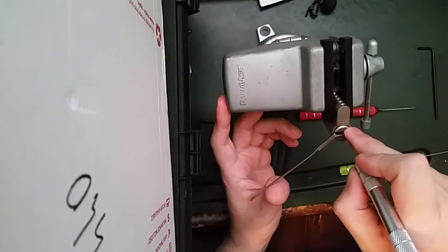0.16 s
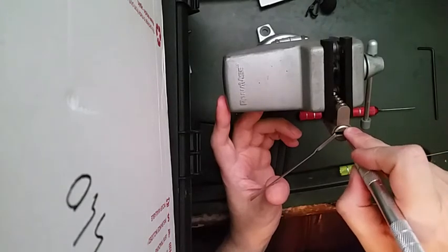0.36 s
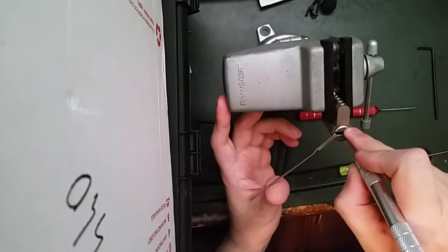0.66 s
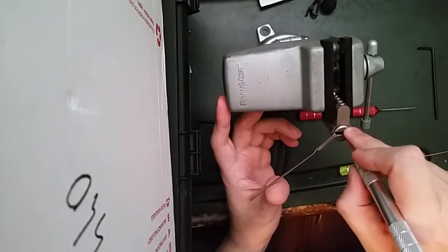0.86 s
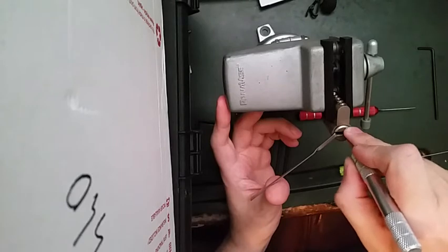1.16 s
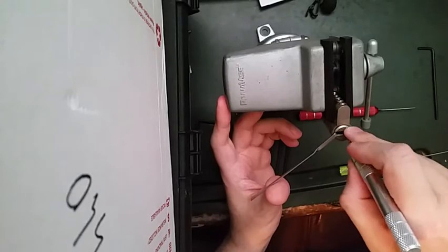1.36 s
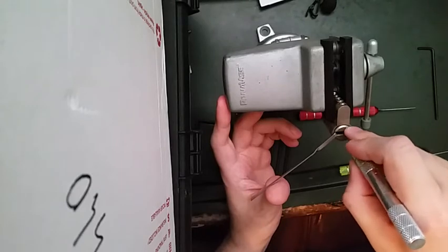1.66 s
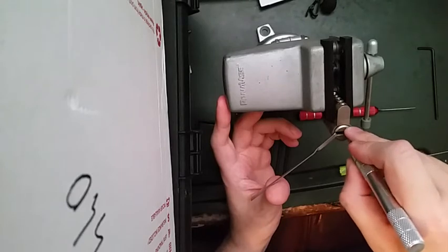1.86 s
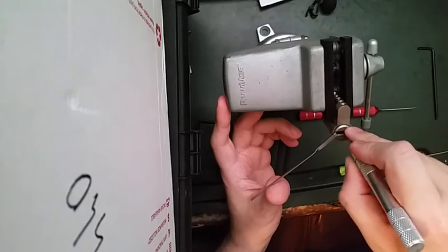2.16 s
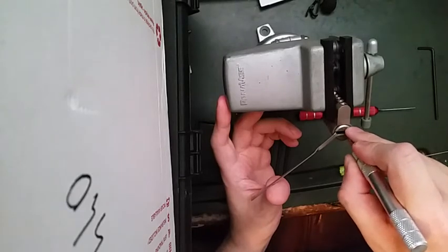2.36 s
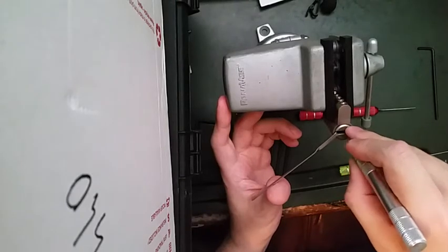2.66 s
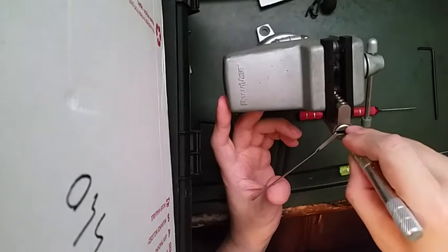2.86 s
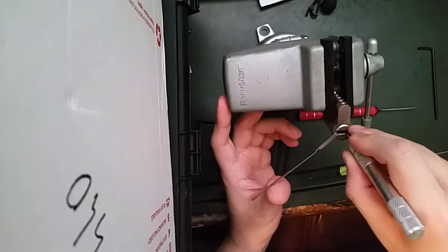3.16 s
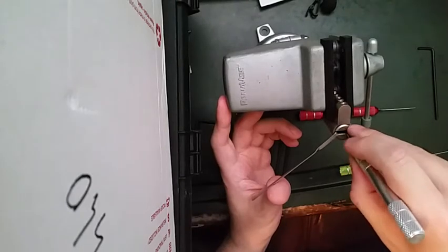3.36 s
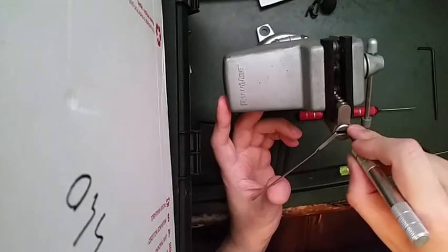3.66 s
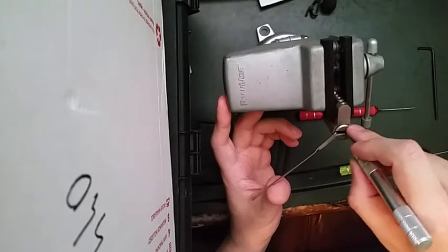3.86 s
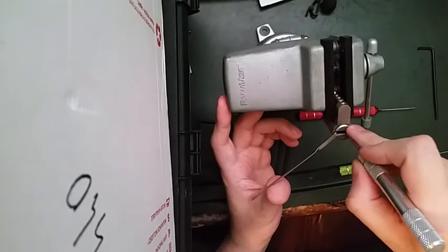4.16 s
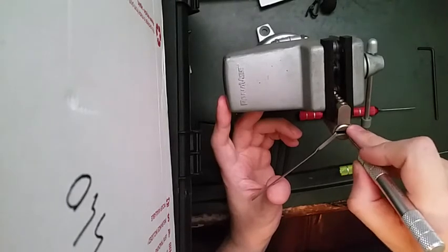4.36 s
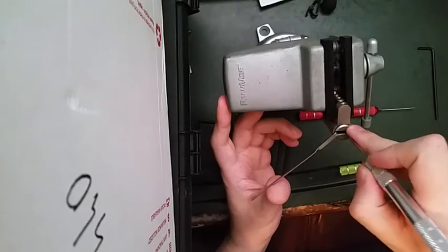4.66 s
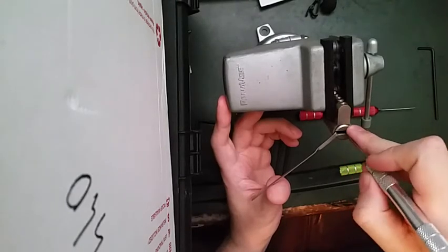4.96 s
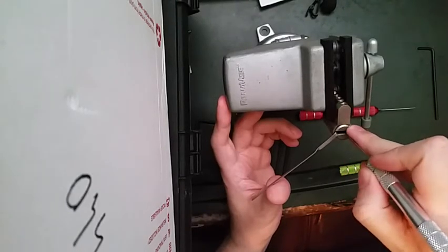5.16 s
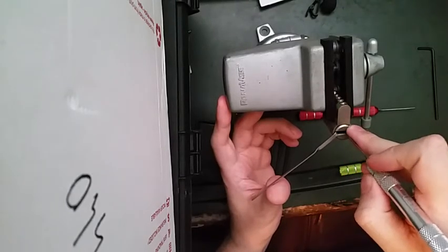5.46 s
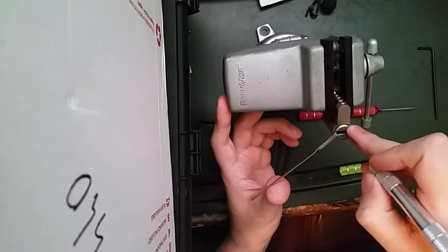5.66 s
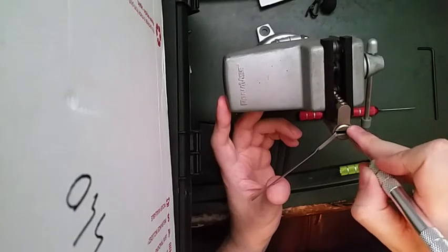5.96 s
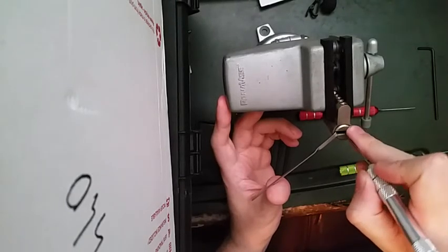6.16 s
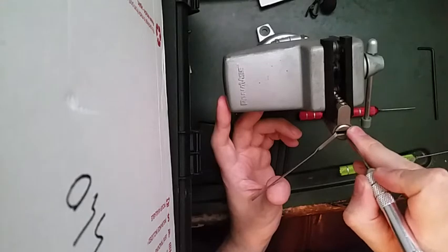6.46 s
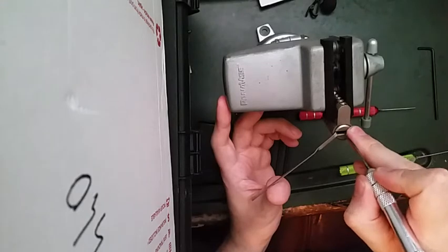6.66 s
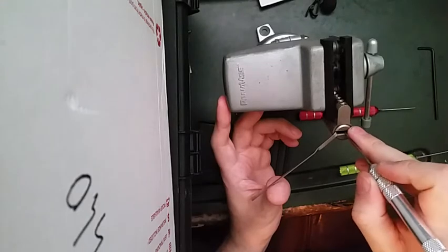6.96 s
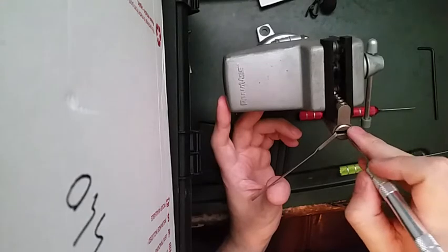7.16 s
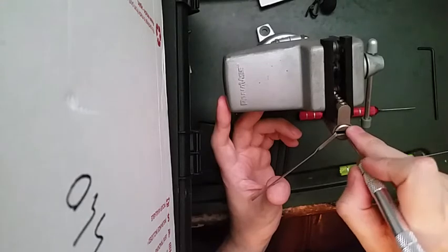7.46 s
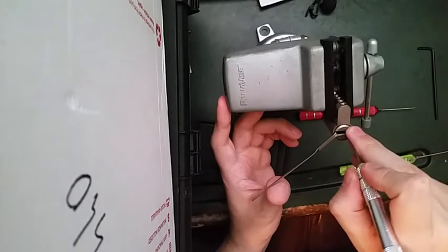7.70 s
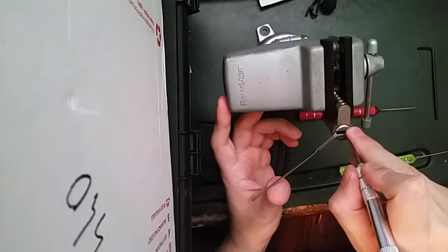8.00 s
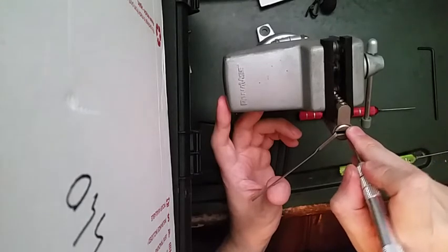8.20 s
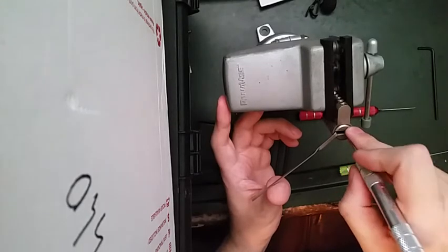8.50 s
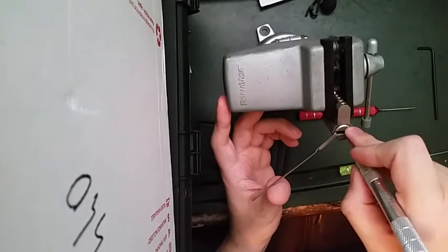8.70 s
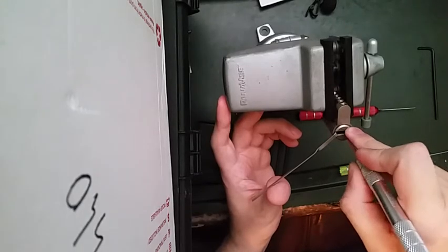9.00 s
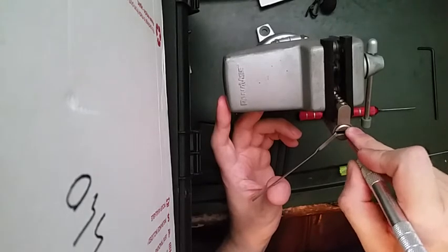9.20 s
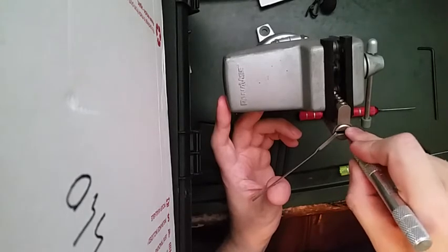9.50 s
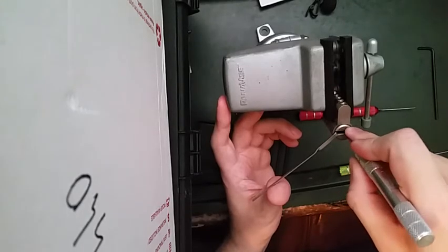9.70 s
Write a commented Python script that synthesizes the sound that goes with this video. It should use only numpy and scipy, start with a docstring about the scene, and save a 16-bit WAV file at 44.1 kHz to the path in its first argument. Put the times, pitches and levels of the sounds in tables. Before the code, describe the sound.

Small, sharp metallic clicks and ticks of a lock being picked come irregularly over a faint hum and high hiss.

```python
"""Lock picking in a bench vise

A pick works the pins: they slip, snap and rebound, the pick ticks and twangs, the wrench clacks.
Lock and vise ring; firmer pushes thud into the bench. The lock is close to the left microphone.
A small dry room answers; under it lie mains hum, a fan and a high, narrow hiss on the left."""
import sys
import numpy as np
from scipy import signal
from scipy.fft import rfft, irfft
from scipy.io import wavfile

SR = 44100
rng = np.random.default_rng(int(sys.argv[2]) if len(sys.argv) > 2 else 0)


def dump(signal):
    """Clip the signal to [-1, 1] and save it as 16-bit WAV at the path in sys.argv[1]."""
    limited = np.clip(np.atleast_2d(signal).T, -1, 1)
    pcm = np.round(limited * 32767).astype(np.int16)
    wavfile.write(sys.argv[1], SR, pcm)


N = 433944

# pin snaps: t/s, travel/s, level/dB, slip re strike/dB, weight/dB, brightness/dB, twang f/Hz,
# twang/dB, clack/dB (weight: low shelf; brightness: high shelf; twang and clack: re level)
PIN_SNAPS = [ (.1112, .0022, -0.5, -2.5, -12, 2, 5030, -12, -19.5),
             (3.2827, 0.00093, -5, -0.5, -6, 3, 5300, -10, -13.5),
             (3.7840, 0.0032, -16, 4, 1, -3.5, 5170, -3, -16),
             (6.4029, 0.0022, -1.5, -8, -6.5, 4.5, 5150, -10, -44),
             (7.2969, .0007, -16, 4.5, 0.5, -4.5, 5160, 5, -26),
             (7.7988, .001, -5.5, -15, -4, 10, 5840, 5, -15),
             (7.8755, .0022, -4.5, 1.5, 2.5, -1, 5700, -6, -17),
             (9.1915, .0019, -4, -1.5, 2, 0, 6000, -16, -18), ]
# pin rebounds, all re the strike: t/s, level/dB, weight/dB, brightness/dB, clack/dB
PIN_REBOUNDS = [(.003, -6.5, -5, -6, 9.5), (.0095, -22, 3, -1, -11)]
# pick touches: t/s, level/dB, weight/dB, brightness/dB, clack/dB
PICK_TICKS = [ (.9639, -16, -3, -4, -16), (1.08, -16.5, 4, 0, -8), (1.3365, -24, 1, 4, -6),
              (1.3526, -17, 4, 0, -5), (1.891, -28.5, 7, -9, -2), (2.301, -38, 11, -27, 6),
              (2.6154, -26.5, 11, -9, -7), (2.822, -27.5, 12, -7, -14), (3.794, -17.5, 20, 1, -12),
              (3.943, -23.5, 1, -3, -13), (3.9649, -16, 8.5, -4.5, -3), (4.523, -21.5, 1, 4, -9),
              (4.577, -17, 2, -3, -3), (4.7308, -22.5, -2, -8, -19), (4.7667, -26.5, 1, -7, -15),
              (4.8865, -27, -3, -13, -18), (4.963, -25.5, 1, -2, -22), (7.249, -23, 3, -2, -20),
              (8.4137, -34.5, -11, 3, -22), (8.910, -36, 24, -23, -11), (9.004, -19, 12.5, -9, -12),
              (9.166, -27, 26.5, -13, -13), (9.372, -23.5, 8, -19, 3), (9.3894, -15.5, 6, -1.5, -0.5), ]
# bare contact spectrum: f/Hz, level/dB
CONTACT_SPECTRUM = [(60, -22), (250, -0.5), (500, -2), (850, -14), (1500, -5.5), (2400, -6), (3600, -8.5),
                    (4700, 5.5), (6200, 1.5), (8000, -1), (9500, 4.5), (11500, 3.5), (14000, 4),
                    (16000, -2)]
# modes of lock and vise, tension wrench, bench: f/Hz, relative level/dB, t60/s
LOCK_MODES = [(986, 5.5, 0.024), (1272, 9.5, 0.033), (1611, 14.5, 0.078), (2256, 7, 0.038),
              (2380, 6.5, 0.054), (2510, 5.5, 0.05), (3200, 6.5, 0.017), (4340, -1, 0.06),
              (5300, -16, 0.041), (6100, 7, 0.026), (7354, 10, 0.037), (8520, 11, 0.069), (9370, -2, 0.032),
              (10860, 4, 0.022), (11650, 3.5, 0.012), (13300, -2, 0.031), (13040, 9, 0.043),
              (15100, 2, .008)]
WRENCH_MODES = [(1690, -13, 0.037), (1698, 14, 0.046), (2290, -27, .025)]
BENCH_MODES = [(45, -18, .15), (82, -19, 0.031), (132.5, 0, 0.079), (190.5, -1, 0.14), (227, -11, 0.097),
               (358, 0.5, 0.053), (505, -2, 0.074)]
# hand pushes: t/s, thud level/dB, contact time/s, rub level/dB
HAND_PUSHES = [ (.963, -45.5, 0.0018, -48), (1.894, -37, .0042, -53), (1.957, -46, .0044, -54),
               (2.004, -37.5, 0.0035, -47.5), (2.301, -48, 0.0015, -70), (2.617, -47, .0014, -66),
               (3.786, -30.5, 0.0038, -56), (3.8008, -32, 0.0022, -60), (3.947, -40, 0.0033, -63),
               (4.963, -41.5, 0.0025, -55), (7.878, -54, 0.0015, -58), (8.912, -43.5, 0.0019, -53.5),
               (8.948, -45, 0.0024, -58), (9.0067, -35, 0.0024, -51), (9.030, -36.5, 0.0047, -52),
               (9.194, -41, 0.00082, -43), (9.377, -34, .0071, -71), ]
# room decay: f/Hz, t60/s
ROOM_DECAY = [(300, 0.5), (1100, 0.22), (2800, 0.24), (7400, 0.23), (15000, 0.14)]
# colour of the room and of the duller right channel: f/Hz, gain/dB
ROOM_GAIN = [(300, 6), (1000, 0.5), (1600, -5.5), (3000, 3.5), (5500, -6), (9000, -6), (14000, -7.5)]
RIGHT_GAIN = [(600, -0.5), (1600, -5.5), (2600, -5.5), (4500, -16.5), (6300, -13), (8000, -5.5),
              (10000, -3.5), (14000, -0.5)]
# mains and fan tones: f/Hz, rms level/dB, phase wander/rad, left minus right/dB
HUM_TONES = [(119.6, -56, 0.11, 3), (136.9, -61, 0.89, -7), (185.6, -68, 1.68, -14.5),
             (237.8, -74, 0.12, -16), (374.6, -69, 1.05, -7), (484, -72.5, 1.3, 2)]
# room air, hiss on both sides, resonant hiss on the left: f/Hz, level in 1 Hz/dB
AIR_SPECTRUM = [(8, -104), (31, -101), (48, -72.5), (65, -80.5), (110, -82.5), (135, -68), (165, -79),
                (205, -77.5), (270, -84.5), (380, -81.5), (600, -88.5), (1100, -97), (1900, -99),
                (6000, -122)]
HISS_SPECTRUM = [(1000, -113), (3500, -110), (6500, -115), (8500, -110), (11000, -107.5), (15500, -103)]
LEFT_HISS_SPECTRUM = [(1500, -125), (2700, -105), (3400, -96), (4000, -85.5), (4350, -83.5), (4700, -87.5),
                      (5200, -97), (5950, -99), (6600, -107), (7300, -104), (8200, -117), (10000, -130)]
# background noise: f/Hz, left-right correlation
NOISE_CORRELATION = [(25, 0.00025), (70, 0), (150, 0.49), (300, 0.91), (600, 0.042), (1500, 0),
                     (6000, 0.83), (9000, 0.98), (15000, 0.99)]


def pins(chatter_t60_s=0.019, twang_t60_s=0.0105, impulse=0.62, weight_hz=2600, bright_hz=9500, size=4096):
    """Each contact: a click with brief chatter, a wrench clack, a damped pick twang. Gives metal, pick."""
    t, hz = np.arange(size) / SR, bins(size)
    metal, pick = np.zeros((2, N))
    low_shelf = 1 / (1 + (hz / weight_hz) ** 4)
    high_shelf = 1 - 1 / (1 + (hz / bright_hz) ** 8)
    clack = unit(sum(gain(db) * np.sin(2 * np.pi * f * t) * decay(t, t60) for f, db, t60 in WRENCH_MODES))
    for at_s, level_db, weight_db, bright_db, twang_hz, twang_db, clack_db in contacts():
        chatter = rng.standard_normal(size) * decay(t, chatter_t60_s)
        chatter[0] += impulse
        spectrum = rfft(chatter)
        whitened = irfft(spectrum / abs(spectrum))  # a short contact feeds all frequencies about equally
        chatter = unit(whitened * decay(t, 2 * chatter_t60_s))
        colour_db = curve(CONTACT_SPECTRUM, hz) + weight_db * low_shelf + bright_db * high_shelf
        colour_db += lock_ring_db(hz) + pin_ripple_db(hz)
        click = signal.fftconvolve(chatter, minimum_phase(colour_db))[:size]
        twang = unit(np.sin(2 * np.pi * twang_hz * t) * decay(t, twang_t60_s))
        add(metal, at_s, gain(level_db) * (click + gain(clack_db) * clack))
        add(pick, at_s, gain(level_db + twang_db) * twang)
    return metal, pick


def contacts(slip_weight_db=2, slip_bright_db=4.5, tick_hz=5400, light_twang_db=-14.5,
             grazes_per_s=0.7, graze_db=-37.5, graze_spread_db=5, graze_tries=24):
    """Pins slip off the pick, strike home and rebound twice; the pick ticks and grazes at random."""
    rows = []  # t/s, level/dB, weight/dB, brightness/dB, twang f/Hz, twang/dB, clack/dB
    for at_s, travel_s, level, slip, weight, bright, twang_hz, twang, clack in PIN_SNAPS:
        rows.append((at_s, level + slip, weight + slip_weight_db, bright + slip_bright_db,
                     twang_hz, twang, clack))
        strike_s = at_s + travel_s
        rows.append((strike_s, level, weight, bright, twang_hz, twang, clack))
        for after_s, d_level, d_weight, d_bright, d_clack in PIN_REBOUNDS:
            rows.append((strike_s + after_s, level + d_level, weight + d_weight, bright + d_bright,
                         twang_hz, light_twang_db, clack + d_clack))
    for at_s, level, weight, bright, clack in PICK_TICKS:
        rows.append((at_s, level, weight, bright, tick_hz, light_twang_db, clack))
    for when, chance, strength in rng.random((graze_tries, 3)):
        if chance < grazes_per_s * N / SR / graze_tries:
            level = graze_db + graze_spread_db * (2 * strength - 1)
            rows.append((when * N / SR, level, -10, 0, tick_hz, light_twang_db, -18))
    return rows


def lock_ring_db(hz, boost_db=2.0, scatter_db=1.0):
    """Resonances of lock and vise; the point of touch decides how much each takes."""
    touch_db = scatter_db * rng.standard_normal(len(LOCK_MODES))
    power = 1
    for (mode_hz, db, t60_s), extra_db in zip(LOCK_MODES, touch_db):
        half_width_hz = np.log(1000) / (2 * np.pi * t60_s)
        power += gain(db + boost_db + extra_db) ** 2 / (1 + ((hz - mode_hz) / half_width_hz) ** 2)
    return 10 * np.log10(power)


def pin_ripple_db(hz, depth_db=4.0, spacing_hz=260):
    """Pins lie at different depths: random peaks and dips per contact, mean power kept."""
    heights = rng.standard_normal(len(hz))
    ripple_db = depth_db * np.interp(hz / spacing_hz, np.arange(len(hz)), heights)
    return ripple_db - 10 * np.log10(np.mean(gain(ripple_db) ** 2))


def bench_thuds(bounce_s=0.00837, bounce_db=-11, size=22050):
    """Pushes ring the bench, heard as its velocity; a longer contact gives a duller thud."""
    t, out = np.arange(size) / SR, np.zeros(N)
    ring = sum(gain(db) * np.cos(2 * np.pi * hz * t) * decay(t, t60) for hz, db, t60 in BENCH_MODES)
    for at_s, level_db, contact_s, _ in HAND_PUSHES:
        force = np.sin(np.pi * np.minimum(t / contact_s, 1)) ** 2
        thud = gain(level_db) * signal.fftconvolve(ring, force / force.sum())[:size]
        add(out, at_s, thud)
        add(out, at_s + bounce_s, gain(bounce_db) * thud)  # the vise rocks back once
    return out


def rub_and_sway(cycles_per_contact=0.97, sway_re_thud_db=-25.5):
    """Skin drags on the vise, higher for a quicker push, and the bench sways."""
    out = np.zeros(N)
    for at_s, thud_db, contact_s, rub_db in HAND_PUSHES:
        rub = swell(length_s=0.041, centre_hz=cycles_per_contact / contact_s, width_oct=0.59)
        sway = swell(length_s=0.49, centre_hz=45, width_oct=0.35)
        add(out, at_s, gain(rub_db) * rub)
        add(out, at_s, gain(thud_db + sway_re_thud_db) * sway)
    return out


def room(x, build_up_s=0.00068, late_s=0.014, late_db=-3.5, echoes_per_s=2500, size=16384):
    """Echoes off the bench top, then weaker ones off the walls; each band has its own decay."""
    t = np.arange(size) / SR
    sign, chance = rng.choice([-1., 1.], size), rng.random(size)
    taps = unit(sign * (chance < echoes_per_s / SR)) * np.sqrt(size)
    taps *= (1 - np.exp(-(t / build_up_s) ** 2)) * gain(late_db * (t > late_s))
    hz, frame_s, bands = signal.stft(taps, SR, nperseg=256)
    t60_s = curve(ROOM_DECAY, hz)[:, None]
    band_gain = gain(curve(ROOM_GAIN, hz))[:, None] * np.sqrt(2 * np.log(1000) / (t60_s * SR))
    _, response = signal.istft(bands * band_gain * decay(frame_s, t60_s), SR, nperseg=256)
    return convolve(x, response)


def room_echoes(x, patterns=5):
    """Random echo patterns take turns, one cycle a second, so clicks ring slightly differently."""
    turn = np.arange(N) * patterns // SR % patterns
    return sum(room(x * (turn == k)) for k in range(patterns))


def hum(wander_hz=2.1):
    """Near-steady mains tones beat against wavering fan tones."""
    t, out = np.arange(N) / SR, np.zeros((2, N))
    for hz, db, wander_rad, pan_db in HUM_TONES:
        phase_rad = 2 * np.pi * (hz * t + rng.random()) + wander_rad * drift(wander_hz)
        out += gain([[db + pan_db / 2], [db - pan_db / 2]]) * np.sqrt(2) * np.sin(phase_rad)
    return out


def air_and_hiss(air_pan_db=-0.5):
    """Low air noise and fine hiss on both sides, plus a narrow hiss on the left."""
    hz = bins(N)
    common, separate, narrow = rfft(rng.standard_normal((3, N))) * np.sqrt(SR / 2)
    correlation = curve(NOISE_CORRELATION, hz)
    right_noise = correlation * common + np.sqrt(1 - correlation ** 2) * separate
    air, hiss = gain(curve(AIR_SPECTRUM, hz)), gain(curve(HISS_SPECTRUM, hz))
    left = np.hypot(gain(air_pan_db / 2) * air, hiss) * common
    left += gain(curve(LEFT_HISS_SPECTRUM, hz)) * narrow
    right = np.hypot(gain(-air_pan_db / 2) * air, hiss) * right_noise
    return irfft(np.array([left, right]), N)


def swell(length_s, centre_hz, width_oct):
    """Noise band, quick rise, slow fade."""
    offset_oct = np.log2((bins(SR) + 1) / centre_hz)
    noise = irfft(rfft(rng.standard_normal(SR)) * np.exp(-(offset_oct / width_oct) ** 2 / 2))
    progress = np.linspace(0, 1, min(round(length_s * SR), SR))
    return np.sin(np.pi * np.sqrt(progress)) ** 2 * noise[:len(progress)] / noise.std()


def drift(cutoff_hz):
    """Slow noise, rms 1."""
    slow = irfft(rfft(rng.standard_normal(N)) * np.exp(-(bins(N) / cutoff_hz) ** 2), N)
    return slow / slow.std()


def minimum_phase(curve_db):
    """Causal impulse response of a gain curve."""
    log_gain = np.log(gain(np.concatenate([curve_db, curve_db[-2:0:-1]])))
    return np.fft.ifft(np.exp(np.conj(signal.hilbert(log_gain)))).real


def curve(points, hz):
    """Interpolation over log frequency."""
    f, value = np.transpose(points)
    return np.interp(np.log(hz + 1), np.log(f + 1), value)


def add(mix, at_s, sound):
    part = mix[max(round(at_s * SR), 0):][:len(sound)]
    part += sound[:len(part)]


def gain(db):
    return 10 ** (np.asarray(db) / 20)


def bins(size):
    return np.fft.rfftfreq(size, 1 / SR)


def convolve(x, response):
    return signal.oaconvolve(x, response)[:N]


def decay(t, t60_s):
    return np.exp(-np.log(1000) * t / t60_s)


def unit(x):
    """Scaled to energy 1."""
    return x / np.linalg.norm(x)


def scene(shadow_db=-11, lag_s=0.00037, bench_room_db=-10, pick_room_db=-7, right_room_db=3.5):
    """The left side faces the lock; the right lies in shadow and hears mostly the room."""
    metal, pick = pins()
    bench = bench_thuds() + rub_and_sway()
    # the thin pick throws little sound into the room
    room_send = metal + gain(pick_room_db) * pick + gain(bench_room_db) * bench
    left = metal + pick + bench + room_echoes(room_send)
    shadowed = gain(shadow_db) * np.roll(metal + pick, round(lag_s * SR))
    right = shadowed + bench + gain(right_room_db) * room_echoes(room_send)
    right = convolve(right, minimum_phase(curve(RIGHT_GAIN, bins(1024))))
    return np.array([left, right]) + hum() + air_and_hiss()


def record(dry):
    """Steep band limit."""
    cutoff_hz = 15850
    low_pass = signal.firwin(511, cutoff_hz, window=("kaiser", 9), fs=SR)
    return signal.oaconvolve(dry, low_pass[None], "same", axes=1)


dry = scene()
out = record(dry)
dump(out)
```